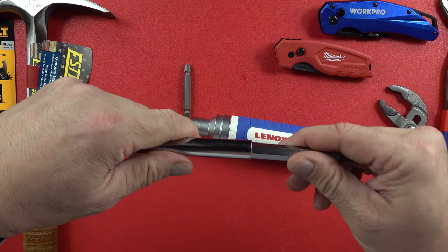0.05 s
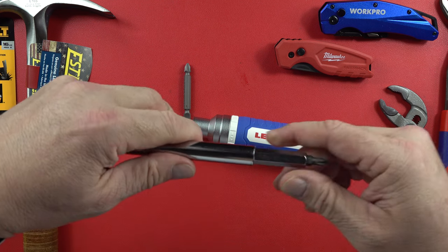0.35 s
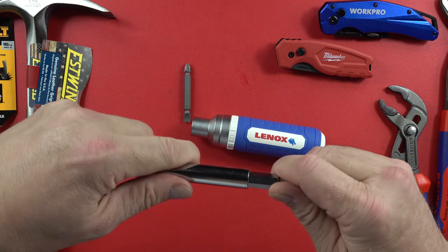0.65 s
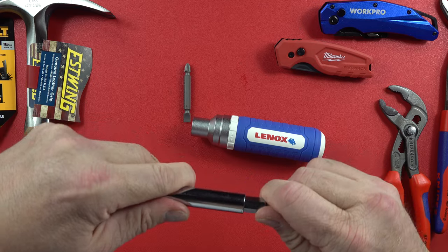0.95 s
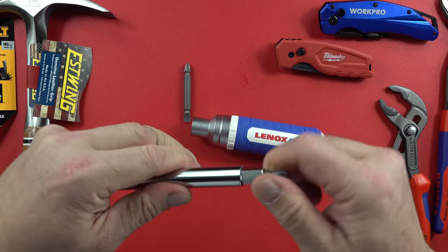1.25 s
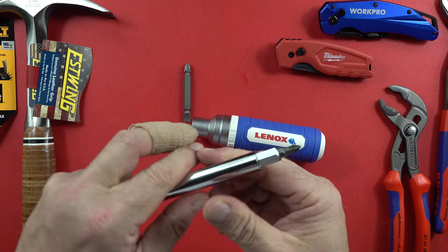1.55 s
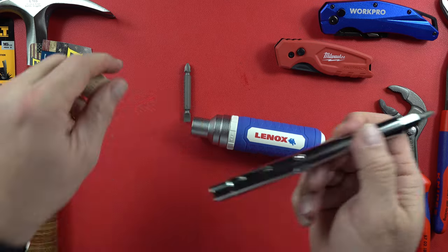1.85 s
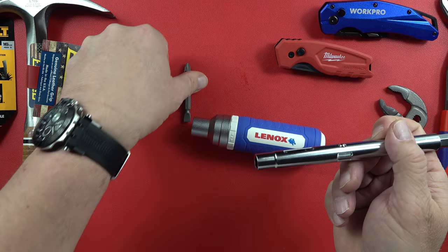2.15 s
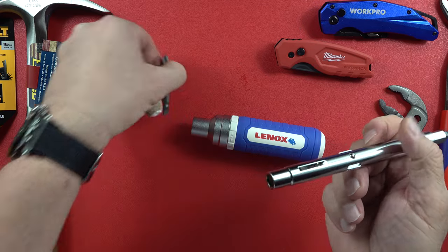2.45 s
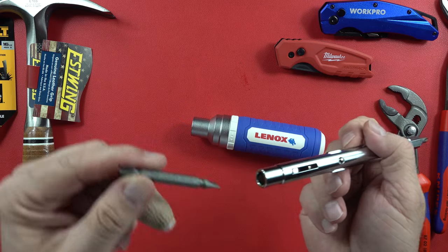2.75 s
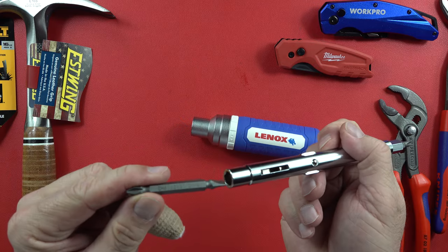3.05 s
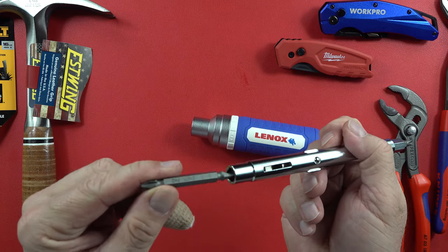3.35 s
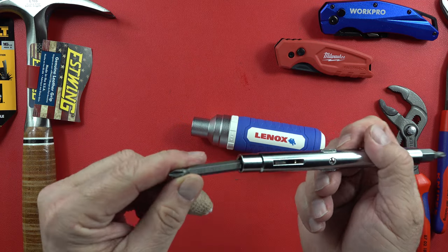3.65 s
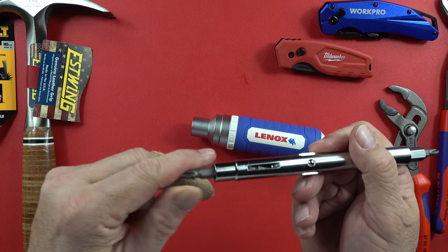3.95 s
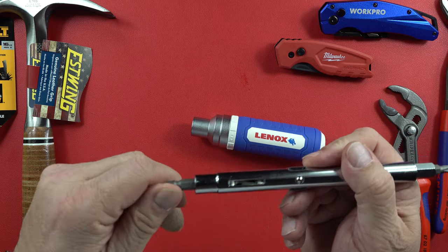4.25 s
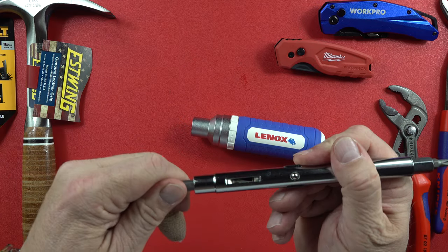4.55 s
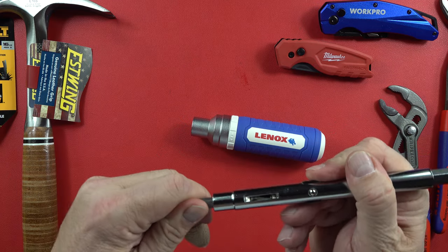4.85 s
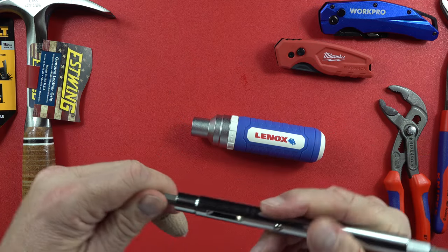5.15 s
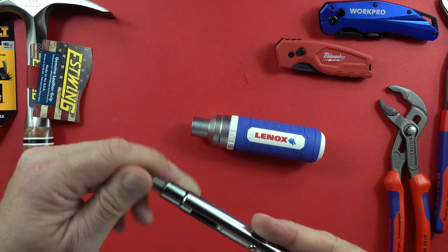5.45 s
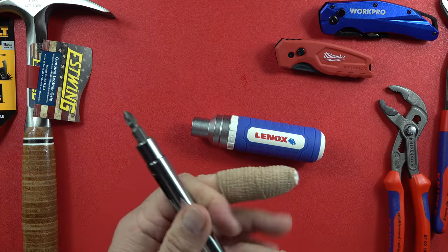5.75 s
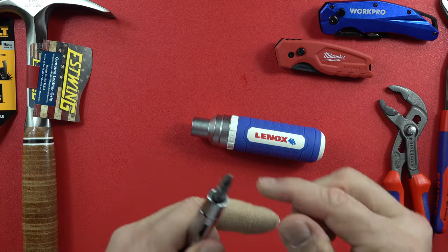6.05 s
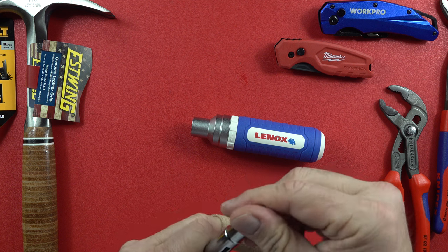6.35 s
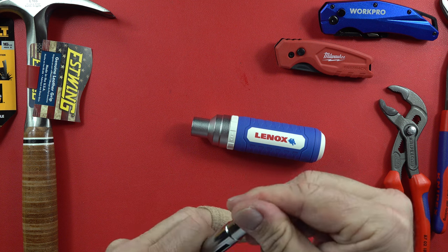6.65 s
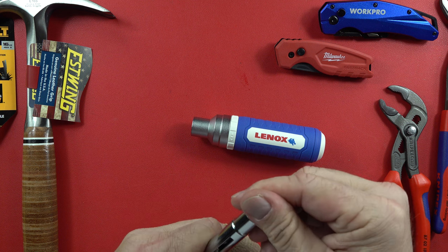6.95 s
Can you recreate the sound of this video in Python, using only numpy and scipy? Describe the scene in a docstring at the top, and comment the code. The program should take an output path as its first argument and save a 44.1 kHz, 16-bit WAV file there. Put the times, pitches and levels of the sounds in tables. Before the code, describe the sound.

In a small, quiet room with a faint ventilation hiss, a close microphone picks up hands changing a screwdriver bit. Short steel scrapes and clicks end in a loud pop as the bit leaves the shaft. After some soft finger scuffs and dull knocks, a second bit clinks against the opening, scrapes inside and locks with one bright snap. Light handling ticks trail off.

```python
"""Steel grates on steel as a double-ended bit is dragged out of a hollow screwdriver shaft.
It catches, then pops past the detent, the little sprung ball that holds it in. Fingers rub, tick and
knock on the tool. Another bit taps the opening, slides in with clinks and scrapes, and snaps home.
Each hit is a burst of tiny bounces plus ringing steel; each scrape is a stream of tiny slips.
It is all heard from close above a table in a small, quiet room with soft ventilation."""
import sys
import numpy as np
from scipy import signal
from scipy.fft import rfft, irfft, next_fast_len
from scipy.io import wavfile
from scipy.ndimage import uniform_filter1d, map_coordinates

SR = 44100
rng = np.random.default_rng(int(sys.argv[2]) if len(sys.argv) > 2 else 0)


def master_out(mix):
    """Clip the mix to full scale and print it as 16-bit PCM to the path in sys.argv[1]."""
    frames = np.transpose(np.atleast_2d(mix))
    ceiling = np.clip(frames, -1, 1)
    pcm = np.round(ceiling * 32767).astype(np.int16)
    wavfile.write(sys.argv[1], SR, pcm)


N = 313110
RING = np.arange(SR // 4) / SR  # seconds since a hit
BASS_EDGE_HZ, TREBLE_EDGE_HZ = 2000, 7500


def amp(db):
    """Turn decibels (dB) into a number to multiply by."""
    return 10 ** (np.asarray(db) / 20)

def unit(x):
    """Scale a signal to an average power of 1."""
    return x / np.sqrt(np.mean(x ** 2) + 1e-20)

def punch(x):
    """Give a hit the energy of a hundredth of a second at power 1."""
    return x / np.sqrt(np.sum(x ** 2) / (SR // 100) + 1e-20)

def fade(t, t60):
    """Die away; t60 is the fade time, the seconds it takes to drop 60 dB."""
    return amp(-60 * t / np.maximum(t60, 1e-3))

def along(points, hz):
    """Read a value between the rows of a (pitch, value) table."""
    pitches, values = np.transpose(points)
    return np.interp(np.log(hz + 1), np.log(pitches + 1), values)

def filtered(x, response):
    """Turn each frequency up or down by response(hz)."""
    n = x.shape[-1]
    padded = next_fast_len(n + SR // 10)
    return irfft(rfft(x, padded) * response(np.fft.rfftfreq(padded, 1 / SR)), padded)[..., :n]

def coloured(x, colour, size=1024):
    """Give x a tone colour: a table of how strong each pitch is."""
    cepstrum = irfft(np.log(amp(along(colour, np.fft.rfftfreq(size, 1 / SR)))))
    cepstrum[1:size // 2] *= 2  # folded so that nothing sounds before its cause
    cepstrum[size // 2 + 1:] = 0
    return signal.fftconvolve(x, irfft(np.exp(rfft(cepstrum))))[:len(x)]

def excite(x, body):
    """Let every sample of x set off the body's sound."""
    return signal.fftconvolve(x, body / np.linalg.norm(body))[:N]

def add(track, start, x):
    """Mix x into the track, start seconds in."""
    i = max(round(start * SR), 0)
    track[i:i + len(x)] += x[:max(N - i, 0)]

def wobble(rate):
    """A smooth curve through rate random points a second."""
    return map_coordinates(rng.standard_normal(int(N * rate / SR) + 4), [np.arange(N) * rate / SR])

def pressure_of(strokes, rise, fall, depth_db):
    """Each stroke swells, holds and eases off; rise and fall are shares of its length."""
    pressure = np.zeros(N)
    for start, length, db in strokes:
        progress = np.linspace(0, 1, max(round(length * SR), 2))
        slack = np.maximum(np.maximum(1 - progress / rise, 1 - (1 - progress) / fall), 0)
        add(pressure, start, amp(db - depth_db * slack))
    return uniform_filter1d(pressure, SR // 250)

def friction(pressure, slips_per_s, spread_db):
    """Rubbing surfaces slip at random moments, harder under more pressure."""
    slips = (rng.random(N) < slips_per_s / SR) * rng.choice([-1, 1], N)
    sizes = amp(spread_db * rng.standard_normal(N))
    return unit(slips * sizes) * pressure

def scrape(slips, notes, colour, notes_db, firm_db=-45):
    """Slips set the steel ringing; only firm pressure brings out the treble."""
    ring = sum(amp(db) * np.sin(2 * np.pi * hz * RING) * fade(RING, t60) for hz, db, t60 in notes)
    clack = coloured(signal.unit_impulse(len(RING)), colour)
    body = clack / np.linalg.norm(clack) + amp(notes_db) * ring / np.linalg.norm(ring)
    sound = excite(slips, body)
    dull = filtered(sound, lambda hz: 1 / (1 + (hz / TREBLE_EDGE_HZ) ** 10))
    pressure = np.sqrt(np.abs(uniform_filter1d(slips ** 2, SR // 50)))
    return dull + (sound - dull) * pressure / (pressure + amp(firm_db))

def settle(t60, rattle_s):
    """Loose parts rattle briefly, then come to rest."""
    return fade(np.hypot(RING, rattle_s) - abs(rattle_s), t60)

def chatter(t60, rattle_s=0):
    """A hit is a dying run of tiny, uneven bounces."""
    sizes = np.exp(0.45 * rng.standard_normal(len(RING)))
    return rng.standard_normal(len(RING)) * sizes * settle(t60, rattle_s)

def steel(notes, colour, t60, notes_db, rattle_s):
    """One hit on hand-held steel: a clack plus ringing notes that shift a little with the grip."""
    shifts, extras_db = rng.normal([[1], [0]], [[.003], [1.2]], (2, len(notes)))
    ring = np.zeros(len(RING))
    for (hz, db, life), shift, extra_db in zip(notes, shifts, extras_db):
        wave = np.sin(2 * np.pi * (hz * shift * RING + rng.random()))
        ring += amp(db + extra_db) * wave * settle(life, rattle_s)
    clack = coloured(chatter(t60, rattle_s), colour)
    return punch(clack) + amp(notes_db) * punch(ring)

def three_bands(hz):
    """Share each frequency out among bass, middle and treble."""
    bass, below_treble = (1 / (1 + (hz / edge) ** 12) for edge in (BASS_EDGE_HZ, TREBLE_EDGE_HZ))
    return np.array([bass, below_treble - bass, 1 - below_treble])

def hits(rows, notes, colour, t60, notes_db, rattle_s, bass_db, treble_db, brightening, firm_db=-30.5):
    """The harder steel parts meet, the more the sound leans from bass to treble."""
    track = np.zeros(N)
    for start, db in rows:
        force_db = db - firm_db
        weights = amp([bass_db - 0.59 * force_db, 0, treble_db + brightening * force_db])
        bands = filtered(steel(notes, colour, t60, notes_db, rattle_s), three_bands)
        add(track, start, amp(db) * sum(weight * punch(band) for weight, band in zip(weights, bands)))
    return track

def taps(rows):
    """Light touches, each a burst of bounces gathered around one pitch."""
    track = np.zeros(N)
    for start, db, pitch, width, t60 in rows:
        resonance = lambda hz: (1j * hz * width / (pitch ** 2 - hz ** 2 + 1j * hz * width)) ** 2
        add(track, start, amp(db) * punch(filtered(chatter(t60), resonance)))
    return track


# Pulls on the old bit. Each row: start in seconds, length in seconds, level in dB.
PULLS = [(0, 0.014, -41), (.05, 0.044, -42.5), (.149, 0.16, -32), (.3, 0.88, -62), (.624, 0.08, -31),
         (.931, 0.028, -33.5)]
# The shaft's ringing notes. Each row: pitch in Hz, relative level in dB, fade time in seconds.
SHAFT_NOTES = [(2650, -8, .05), (3080, -4, .06), (3230, -3, .05), (3480, 0, .08), (3680, -5, .09),
               (3817, -3, .11), (4273, -1, .1), (4440, 1, .06), (4840, -5, .04), (5770, -8, .03),
               (6220, -6, .03), (9080, -4, .04), (9350, -8, .03), (15700, -20, .04)]
# The colour of its clack. Each row: pitch in Hz, relative level in dB.
SHAFT_COLOUR = [(100, -39), (600, -28), (1200, -7.5), (2000, -11.5), (3400, 3.5), (4500, 0.5), (6300, -6),
                (7900, -19), (8600, -10.5), (9150, -2.5), (9750, -14.5), (10500, -24.5), (16000, -33)]

def old_bit_grating():
    """The old bit grates along the inside of the shaft."""
    pull = pressure_of(PULLS, rise=0.17, fall=0.48, depth_db=19)
    slips = friction(pull, slips_per_s=1000, spread_db=-0.5)
    return scrape(slips, SHAFT_NOTES, SHAFT_COLOUR, notes_db=-10.5, firm_db=-43)

def singing(x, hz, db, t60):
    """One note that the fingers barely muffle rings on after scrapes and hits."""
    ring = np.sin(2 * np.pi * hz * RING) * fade(RING, t60) * (1 - RING / RING[-1])
    return amp(db) * excite(x, ring)

# The colour of the room's air noise. Each row: pitch in Hz, relative level in dB.
AIR_COLOUR = [(12, -38.5), (20, -9.5), (43, 1), (86, -10), (120, -5.5), (198, -11), (262, -10.5), (388, -8),
              (607, -14.5), (780, -9), (1710, -17.5), (1860, -14), (2080, -18), (11100, -28),
              (16000, -30.5)]
# How alike that noise is in both ears. Each row: pitch in Hz, likeness from -1 (opposite) to 1 (same).
EAR_LIKENESS = [(30, .997), (60, 0.96), (150, 0.95), (380, 0.13), (950, -0.21), (2380, -0.55),
                (5980, 0.081), (15000, 0.81)]
# The room's hum. Each row: pitch in Hz, level in dB before hum_db is added.
HUM_TONES = [(37.7, -70.5), (110, -72.5), (797, -96.5), (1798, -77), (4081, -84.5), (5760, -83),
             (5879, -86)]

def ventilation(air_db, hum_db):
    """Soft ventilation noise and hiss run throughout, with a few faint, unsteady tones."""
    angle = lambda hz: np.arccos(np.clip(along(EAR_LIKENESS, hz), -1, 1)) / 2
    shape = lambda hz: amp(along(AIR_COLOUR, hz)) * [np.cos(angle(hz)), np.sin(angle(hz))]
    mid, side = filtered(rng.standard_normal((2, N)), shape)
    drift = lambda: np.cumsum(rng.normal(0, .02, N))
    t = np.arange(N) / SR
    hum = sum(amp(db + hum_db) * np.sin(2 * np.pi * hz * t + drift()) for hz, db in HUM_TONES)
    return amp(air_db) * unit(np.array([mid + side, mid - side])) + hum

# The old bit catching in the shaft. Each row: start in seconds, level in dB.
CATCHES = [(0.0308, -45), (0.0709, -43), (0.0885, -28.5), (0.185, -28), (0.307, -41.5), (0.598, -46),
           (0.638, -30), (0.6445, -28), (0.6669, -22.5), (0.7913, -51.5), (0.836, -47.5)]

def old_bit_catching():
    """The bit catches on its way out, and briefly sticks and slips in an even judder."""
    first_s, gap_s, slip_db = .4075, .0475, -53.5
    judder = [(first_s + k * gap_s, slip_db + rng.normal(0, 1)) for k in range(3)]
    return hits(CATCHES + judder, SHAFT_NOTES, SHAFT_COLOUR, t60=0.056, notes_db=-6.5,
                rattle_s=0.00452, bass_db=-19, treble_db=-16.5, brightening=.3)

# Strokes of skin on the tool. Each row: start in seconds, length in seconds, level in dB.
RUBS = [(.035, 0.059, -50.5), (.17, 0.12, -51.5), (.632, .04, -44.5), (1.34, 0.08, -58.5),
        (1.81, 0.11, -59), (2.23, .13, -59), (2.55, 0.19, -64.5), (5.56, 0.49, -57), (6.72, .28, -81)]
# The colour of rubbing skin. Each row: pitch in Hz, relative level in dB.
SKIN_COLOUR = [(200, -4), (700, -3), (1400, -1), (2500, -10.5), (5000, -7), (7500, -19.5), (10000, -12.5),
               (16000, -28)]

def finger_rubs():
    """Skin scuffs unevenly along the shaft."""
    rub = pressure_of(RUBS, rise=0.59, fall=0.26, depth_db=10.5)
    slips = friction(rub, slips_per_s=1400, spread_db=-1.5) * unit(amp(3.9 * wobble(rate=45)))
    return excite(slips, coloured(signal.unit_impulse(len(RING)), SKIN_COLOUR))

# Metal ticking in the fingers. Each row: start in seconds, level in dB, pitch in Hz, pitch spread in Hz.
TICKS = [(.615, -43, 4100, 900), (1.362, -55, 1680, 1090), (2.179, -44.5, 3000, 1580),
         (2.297, -53, 4100, 5470), (4.544, -47, 9940, 2600), (5.44, -56.5, 4440, 7040),
         (5.479, -42, 1120, 260), (5.922, -53, 4780, 2590), (6.2878, -53, 2470, 690),
         (6.909, -57.5, 3180, 3200)]
# The fingers changing their hold. Each row: start in seconds, end in seconds.
REGRIPS = [(1.25, 1.7), (5.3, 5.6)]

def metal_ticks():
    """Firm ticks are short, grazing ones linger; a change of grip scatters faint ones at random."""
    click_db, click_hz, click_width_hz = -19, 3950, 3400  # the broad click within each tick
    gap_s, graze_db, graze_hz, graze_width_hz = 0.13, -60.5, 5100, 5800
    life = lambda db: 0.068 * 2 ** ((-53.5 - db) / 7)  # 7 dB firmer halves the fade time
    rings = [(s, db, hz, width, life(db)) for s, db, hz, width in TICKS]
    clicks = [(s, db + click_db, click_hz, click_width_hz, life(db)) for s, db, _, _ in TICKS]
    grazes = [(s + gap_s * rng.random() / 2, graze_db, graze_hz, graze_width_hz, life(graze_db))
              for start, end in REGRIPS for s in np.arange(start, end, gap_s)]
    return taps(rings + clicks + grazes)

def hand_jolts(rows, above_db=-24, softer_db=26, hz=320, width_hz=380, t60=.036):
    """The hardest hits jolt the hand with a dull bump."""
    return taps([(start, db - softer_db, hz, width_hz, t60) for start, db in rows if db > above_db])

# The detent letting go. Each row: start in seconds, level in dB.
POPS = [(0.9365, -26), (0.9462, -18.5)]
# The pop's ringing notes. Each row: pitch in Hz, relative level in dB, fade time in seconds.
POP_NOTES = [(1254, 1, .08), (1450, -6, .05), (2426, -4, .06), (2620, -2, .06), (3480, 0, .05),
             (3820, -1, .07), (4300, -2, .04), (5350, -4, .03), (7000, -6, .03), (8750, -4, .04),
             (12500, -14, .03)]
# The colour of its clack. Each row: pitch in Hz, relative level in dB.
POP_COLOUR = [(100, -34.5), (500, -24.5), (850, -25), (1080, -6), (1270, -7), (1600, -0.5), (2100, -11.5),
              (2600, -3.5), (3550, 1.5), (5000, -1), (8600, -9), (13500, -24), (16000, -19)]

def detent_pop():
    """The ball lets go and the old bit pops free."""
    return hits(POPS, POP_NOTES, POP_COLOUR, t60=0.034, notes_db=-5,
                rattle_s=0.0062, bass_db=-5, treble_db=-16, brightening=0.79)

# Dull knocks of the hand, on the tool and once (2.177 s) on the table. Each row: start in seconds, level in dB,
# pitch in Hz, fade time in seconds.
KNOCKS = [(1.359, -55.5, 338, .072), (1.809, -48, 326, 0.29), (2.177, -46, 243, 0.094),
          (2.542, -58.5, 390, 0.027), (2.888, -49.5, 320, 0.24), (5.437, -49, 314, 0.23),
          (5.479, -47, 397, 0.028)]

def hand_knocks(width_hz=300, slow_s=.14):
    """The fingers knock on the tool, and once on the table; after a slow, soft knock the palm follows with a
    low thud."""
    lag_s, softer_db, thud_hz, thud_width_hz, thud_t60 = 0.031, 3, 114, 47, 0.099
    knocks = [(start, db, hz, width_hz, t60) for start, db, hz, t60 in KNOCKS]
    thuds = [(start + lag_s, db - softer_db, thud_hz, thud_width_hz, thud_t60)
             for start, db, _, t60 in KNOCKS if t60 > slow_s]
    return taps(knocks + thuds)

# The new bit's tip striking the shaft. Each row: start in seconds, level in dB.
TIP_HITS = [(3.1774, -34), (3.3648, -26.5)]
# The tip's ringing notes. Each row: pitch in Hz, relative level in dB, fade time in seconds.
TIP_NOTES = [(3010, -2, .06), (3720, -8, .04), (3990, -2, .045), (4240, -16, .14), (4450, -6, .045),
             (5230, -4, .035), (5850, -4, .03), (9220, -1, .04), (10750, -5, .04), (11100, -5, .055)]
# The colour of its clack. Each row: pitch in Hz, relative level in dB.
TIP_COLOUR = [(100, -38), (1000, -35), (1800, -21.5), (2300, -7), (3000, -8), (3400, -9), (4000, 2.5),
              (6000, -2), (7800, -9), (9300, -4.5), (11200, -1.5), (11800, -19.5), (14000, -27),
              (15500, -14)]

def new_bit_aiming():
    """The new bit's tip strikes the mouth of the shaft and rings."""
    return hits(TIP_HITS, TIP_NOTES, TIP_COLOUR, t60=0.055, notes_db=1.5,
                rattle_s=0.0012, bass_db=-21, treble_db=-5, brightening=0.7)

# Pushes on the new bit. Each row: start in seconds, length in seconds, level in dB.
PUSHES = [(3.382, .092, -45.5), (3.801, 0.082, -39.5), (4.061, 0.063, -62)]
# The bit's ringing notes. Each row: pitch in Hz, relative level in dB, fade time in seconds.
BIT_NOTES = [(2184, -8, 0.035), (3070, -12, 0.067), (3980, -7, 0.062), (4110, -8, 0.061), (4500, -1, .04),
             (5100, 1.5, 0.037), (5600, 3.5, 0.018), (6200, -5, .03), (9500, -5, .035), (9800, -8, .04)]
# The colour of its clack. Each row: pitch in Hz, relative level in dB.
BIT_COLOUR = [(100, -31.5), (800, -27), (1700, -12.5), (2150, -14.5), (3400, -4.5), (4200, 1.5),
              (5900, 1.5), (7800, -9), (9400, -2), (10200, -20), (12300, -21.5), (15500, -16)]

def new_bit_sliding():
    """The new bit scrapes down the shaft and stirs the air inside."""
    push = pressure_of(PUSHES, rise=.25, fall=0.038, depth_db=14)
    slips = friction(push, slips_per_s=1100, spread_db=0.5)
    return scrape(slips, BIT_NOTES, BIT_COLOUR, notes_db=-11.5) + shaft_air(push, PUSHES)

def shaft_air(pressure, strokes, start_hz=2040, rise_hz_per_s=2700, width_hz=200, gain_db=-16.5):
    """The air in the shaft sounds a breathy note that rises as each push shortens the hollow."""
    pitch = np.full(N, float(start_hz))
    for start, length, _ in strokes:
        add(pitch, start, rise_hz_per_s * np.arange(round(length * SR)) / SR)
    phase = 2 * np.pi * np.cumsum(pitch) / SR
    flutter = filtered(rng.standard_normal((2, N)), lambda hz: 1 / (1 + (hz / width_hz) ** 2))
    return amp(gain_db) * pressure * unit(flutter[0] * np.cos(phase) + flutter[1] * np.sin(phase))

# The new bit bumping the inside wall. Each row: start in seconds, level in dB.
CLINKS = [(3.471, -30), (3.658, -37.5), (3.7007, -44), (3.7192, -37), (3.8175, -44), (3.8335, -27)]

def new_bit_clinking():
    """The bit clinks against the shaft on its way in."""
    return hits(CLINKS, BIT_NOTES, BIT_COLOUR, t60=0.0322, notes_db=-1.5,
                rattle_s=0.0028, bass_db=-22, treble_db=-8, brightening=0.89)

# The detent snapping in. Each row: start in seconds, level in dB.
SNAP = [(3.8893, -19.5)]
# The snap's ringing notes. Each row: pitch in Hz, relative level in dB, fade time in seconds.
SNAP_NOTES = [(2250, -17, .035), (2920, -13, .035), (3200, -11, .03), (3680, -8, .035), (4210, -9, .04),
              (5060, 0, .045), (5820, -1, .05), (6600, -4, .05), (9570, -9, .035), (10760, -2, .045),
              (11480, -4, .045), (12330, -2, .045), (12650, -9, .05), (15700, -15, .04)]
# The colour of its clack. Each row: pitch in Hz, relative level in dB.
SNAP_COLOUR = [(200, -50), (700, -23.5), (1700, -18), (2200, -0.5), (3300, -3.5), (5000, 9.5), (6700, 4.5),
               (7700, -10), (8700, 3), (10800, 3), (12600, -2.5), (13300, -6), (16000, -16)]

def detent_snap():
    """The ball snaps into place with one bright hit as the new bit goes home."""
    return hits(SNAP, SNAP_NOTES, SNAP_COLOUR, t60=0.037, notes_db=-0.5,
                rattle_s=0.0055, bass_db=-17.5, treble_db=-10.5, brightening=0.68)

# The colour of sound scattered close by. Each row: pitch in Hz, relative level in dB.
SCATTER_COLOUR = [(200, -7), (1200, 0.5), (3000, -1), (6000, -1), (9000, 10.5), (13000, 1)]

def close_scatter(x, lean_left_db, side_db=-10):
    """Table and hands scatter the sound a little differently to each side."""
    scatter = coloured(chatter(t60=0.014) * (1 - np.exp(-RING / .001)), SCATTER_COLOUR)
    side = amp(side_db) * excite(x, scatter)
    return np.array([x + side, x - side]) * amp([[lean_left_db / 2], [-lean_left_db / 2]])

def early_echoes(x, echo_db, t60, count=24):
    """Nearby walls and tools return a spray of weak copies of the sound."""
    delays = rng.uniform(.004, 0.053, count)
    echoes = np.zeros(len(RING))
    echoes[(delays * SR).astype(int)] = rng.standard_normal(count) * fade(delays, t60)
    return amp(echo_db) * excite(x, echoes)

# How long the room rings. Each row: pitch in Hz, fade time in seconds.
ROOM_FADES = [(200, 0.73), (1200, 0.47), (4000, 0.42), (9000, 0.28), (15000, 0.24)]

def room_wash(x, wash_db, build_s, side_db=-10):
    """Sound lingers between the walls as a smooth wash, treble dying first."""
    hz, t, spectra = signal.stft(x, SR, nperseg=256)
    age = t[t < .5]
    decay = (fade(age, along(ROOM_FADES, hz)[:, None]) * (1 - np.exp(-age / build_s))) ** 2
    decay /= decay.sum(axis=1, keepdims=True)
    energy = signal.fftconvolve(np.abs(spectra) ** 2, decay, axes=1)[:, :len(t)]
    noise = signal.stft(rng.standard_normal((2, N)), SR, nperseg=256)[2]
    wash = noise * np.sqrt(np.abs(energy) / np.mean(np.abs(noise) ** 2))
    mid, side = signal.istft(wash, SR, nperseg=256)[1][:, :N]
    return amp(wash_db) * np.array([mid + amp(side_db) * side, mid - amp(side_db) * side])

def scene():
    """The old bit comes out and the new one goes in, with the hands and the room around them."""
    dragging = old_bit_grating() + old_bit_catching()
    old_bit = dragging + singing(dragging, hz=3791, db=-26, t60=0.46) + detent_pop()
    hands = hand_jolts(CATCHES + POPS) + finger_rubs() + hand_knocks() + metal_ticks()
    handling = old_bit + hands
    feeding = new_bit_sliding() + new_bit_aiming() + new_bit_clinking()
    new_bit = feeding + singing(feeding, hz=4280, db=-24.5, t60=.24) + detent_snap()
    direct = close_scatter(handling, lean_left_db=0.5) + close_scatter(new_bit, lean_left_db=-1.1)
    echoes = early_echoes(handling + new_bit, echo_db=-13.5, t60=0.23)
    wash = room_wash(handling, wash_db=-10, build_s=0.0024)
    wash += room_wash(new_bit, wash_db=-13.5, build_s=0.016)
    return direct + echoes + wash + ventilation(air_db=-57, hum_db=2.5)

def record(dry):
    """Cut away the very highest treble, above 16000 Hz."""
    return filtered(dry, lambda hz: hz < 16000)


dry = scene()
out = record(dry)
master_out(out)
```